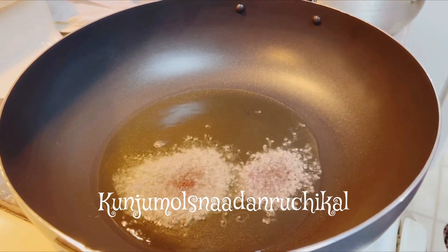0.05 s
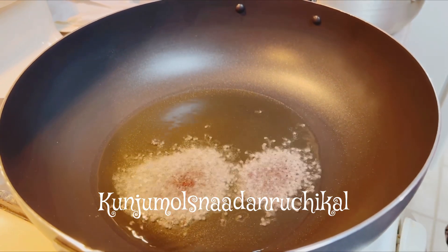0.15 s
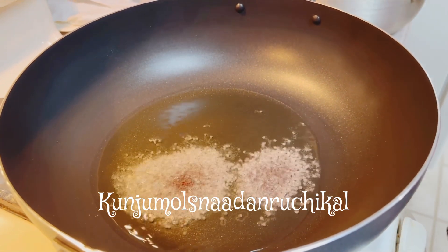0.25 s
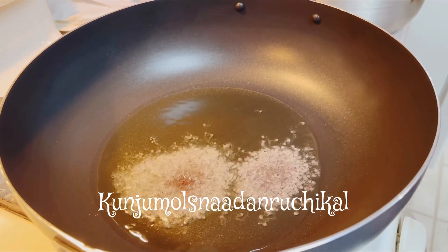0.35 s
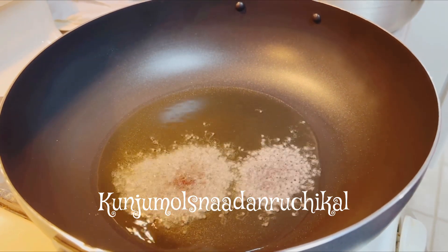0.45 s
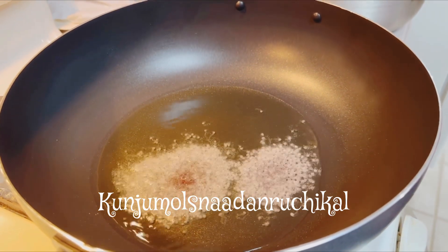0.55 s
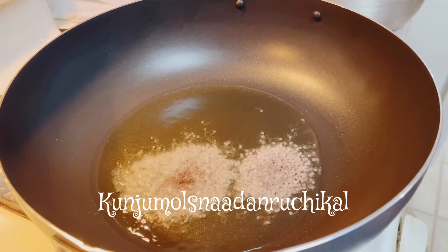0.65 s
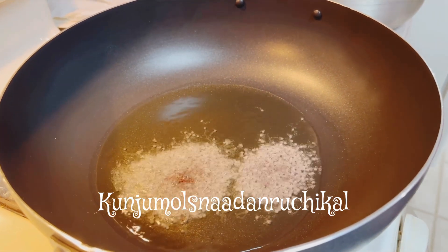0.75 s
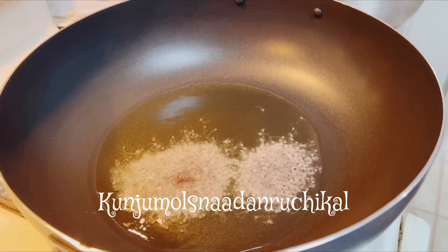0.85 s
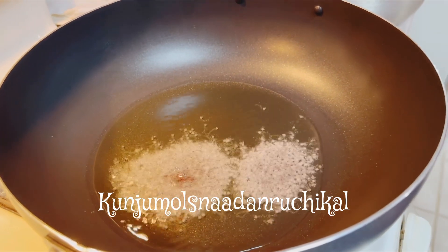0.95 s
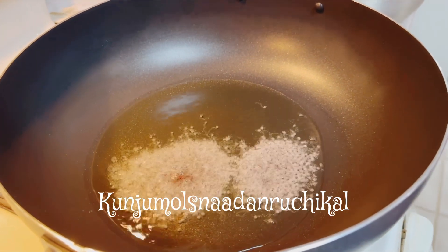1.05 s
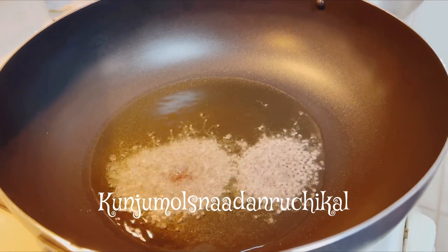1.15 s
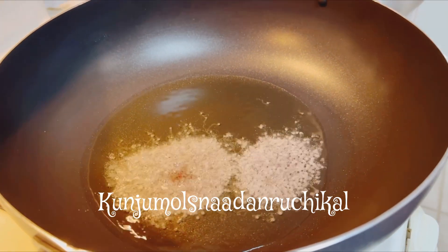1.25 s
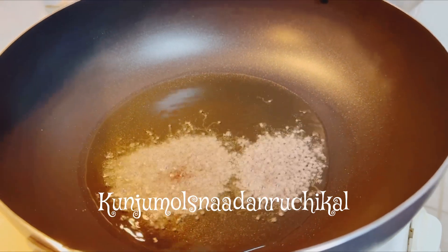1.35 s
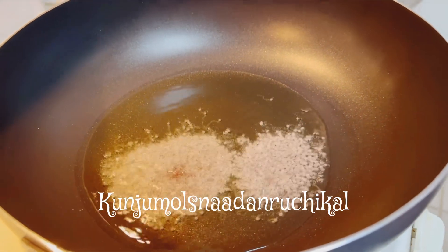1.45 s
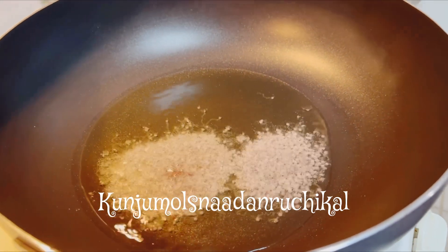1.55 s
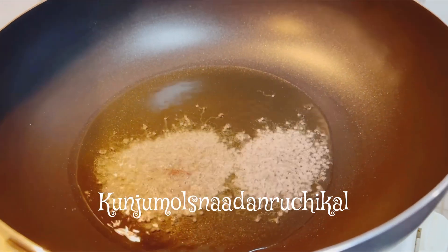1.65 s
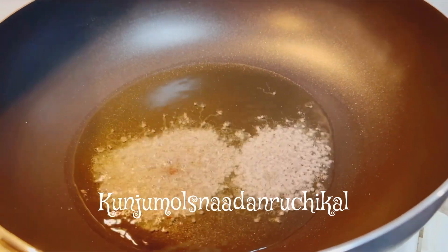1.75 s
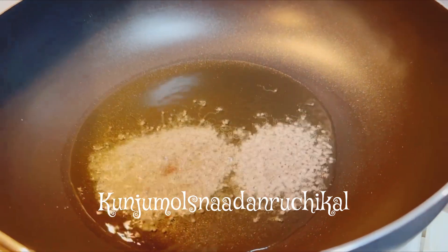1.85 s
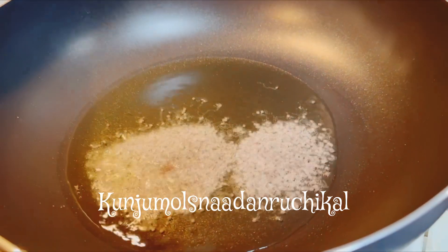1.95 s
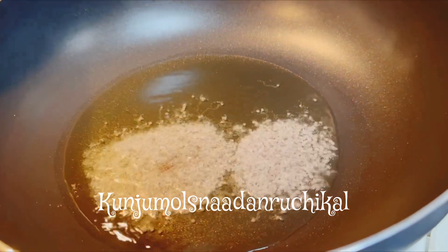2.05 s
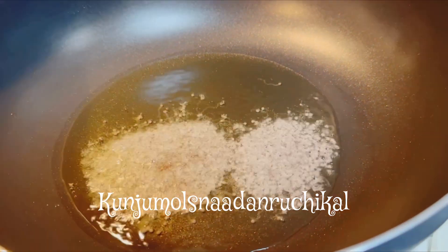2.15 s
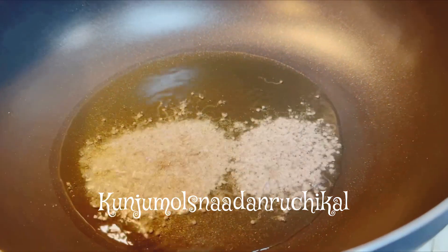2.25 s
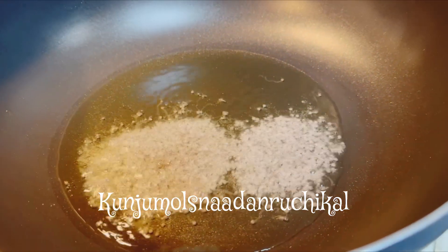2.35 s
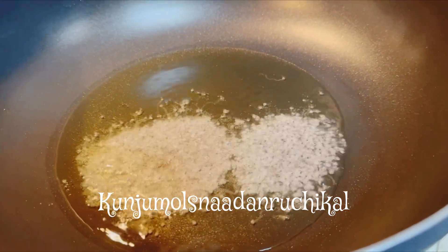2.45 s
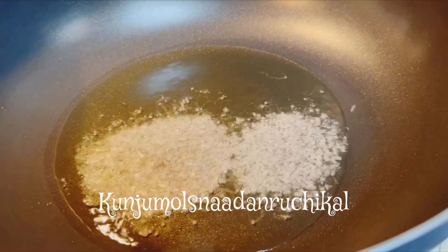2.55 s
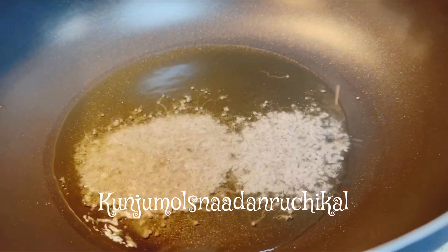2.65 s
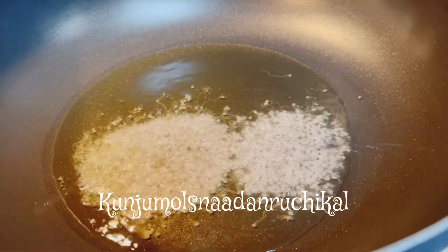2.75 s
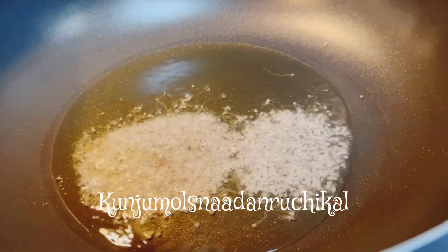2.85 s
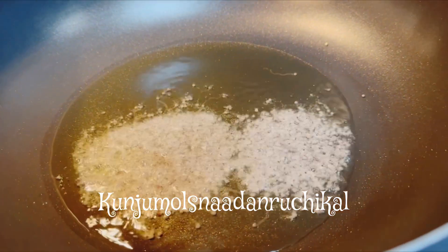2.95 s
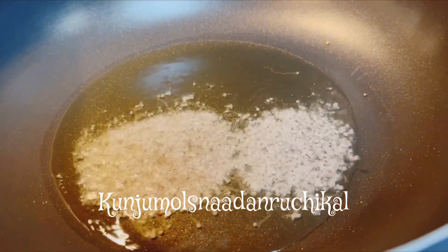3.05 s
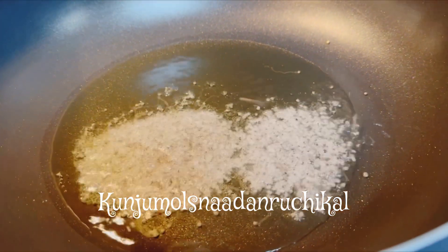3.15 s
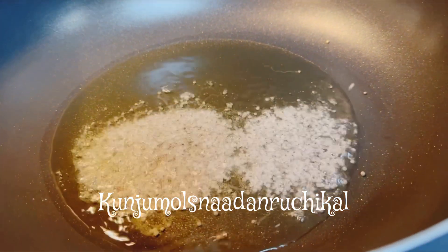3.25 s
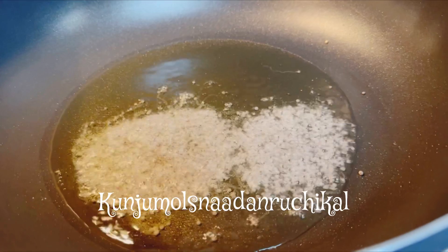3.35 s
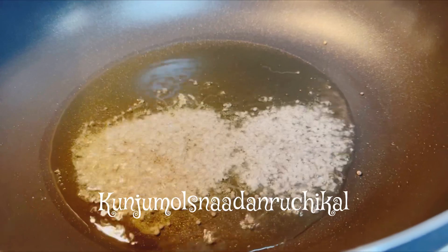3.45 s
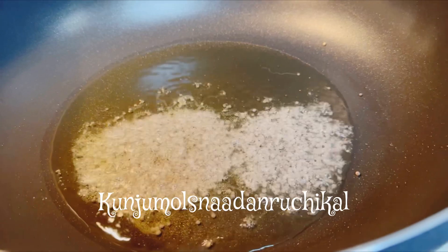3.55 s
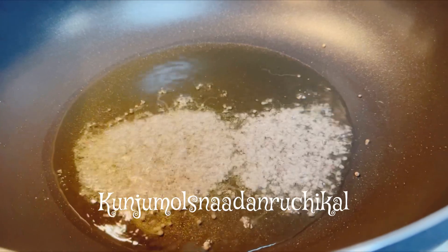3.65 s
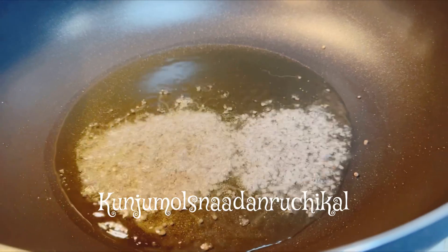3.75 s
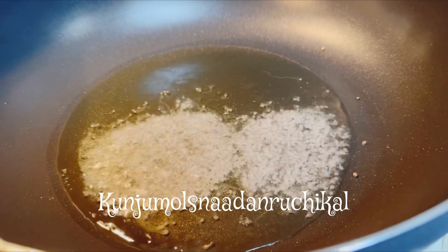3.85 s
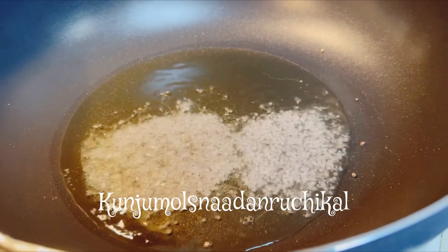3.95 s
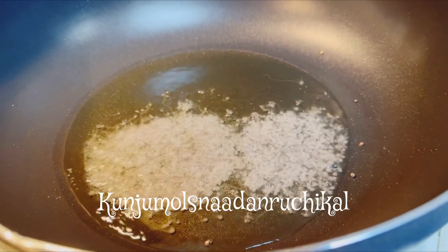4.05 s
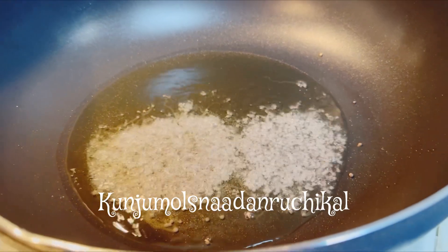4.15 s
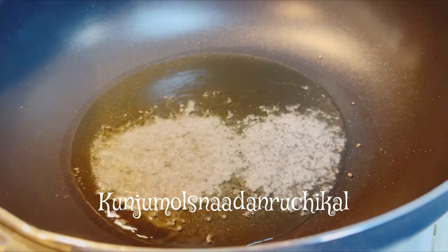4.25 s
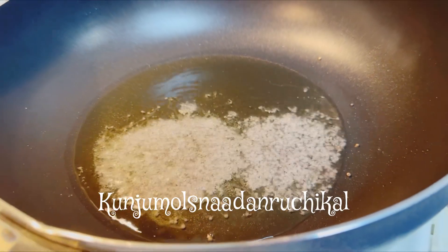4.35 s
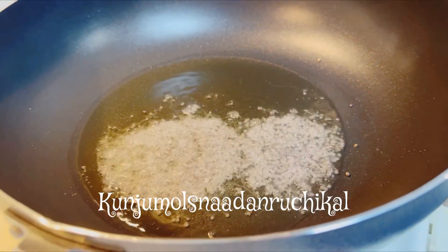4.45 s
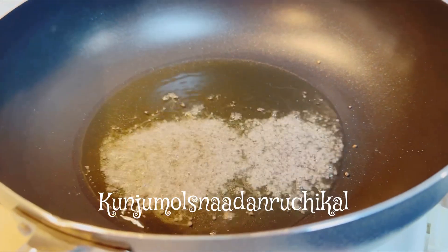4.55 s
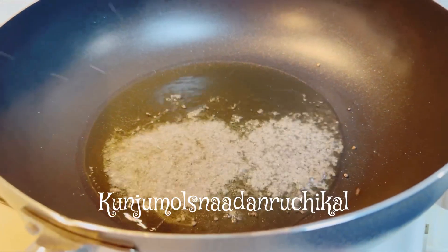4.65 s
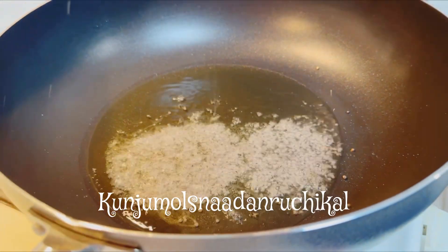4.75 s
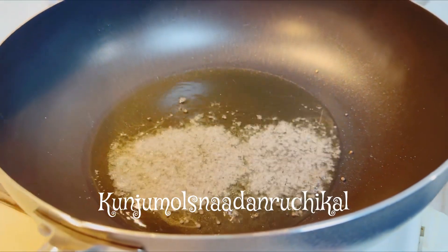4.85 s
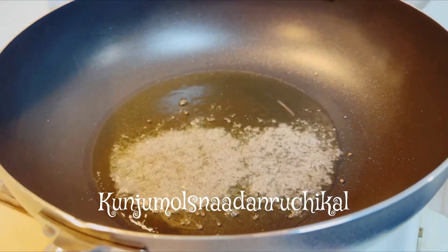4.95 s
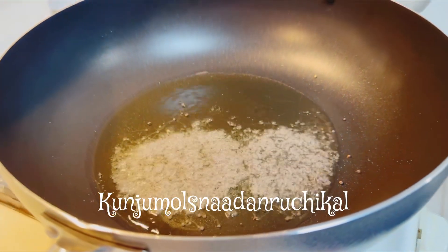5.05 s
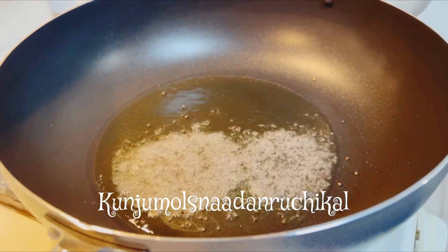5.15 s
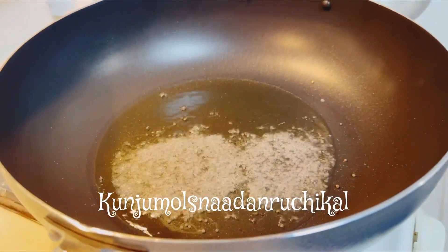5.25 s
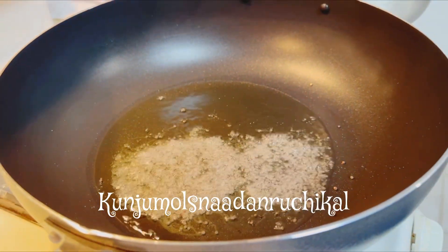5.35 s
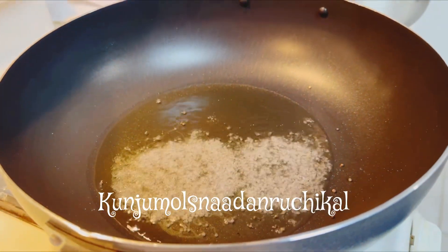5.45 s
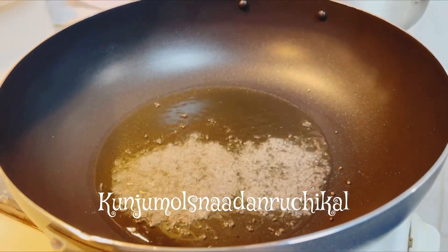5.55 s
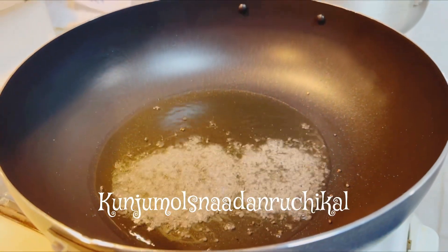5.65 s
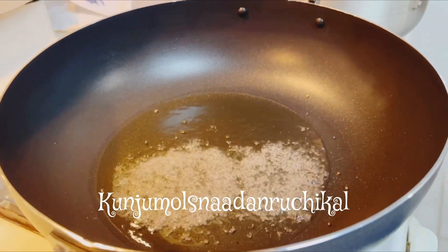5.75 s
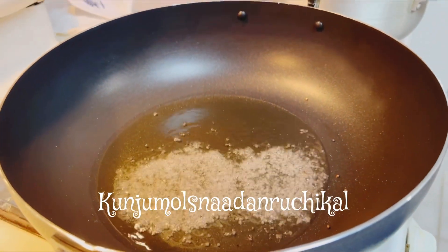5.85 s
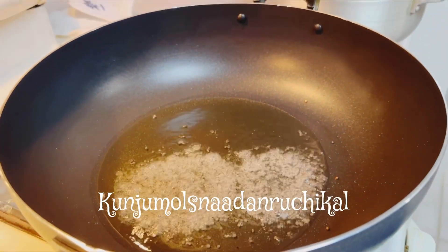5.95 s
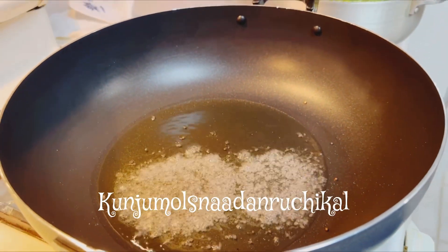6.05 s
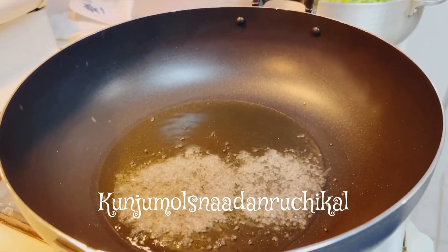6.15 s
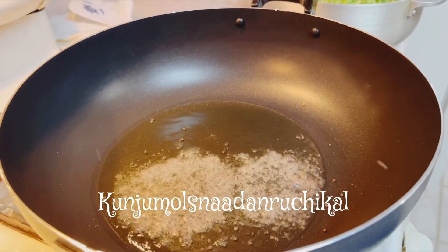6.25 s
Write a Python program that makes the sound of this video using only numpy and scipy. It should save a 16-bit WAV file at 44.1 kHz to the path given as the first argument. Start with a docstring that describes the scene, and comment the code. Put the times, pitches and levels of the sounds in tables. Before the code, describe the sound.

Small seeds fry in hot oil in a steel wok, heard close up in a kitchen. At first there is only a faint sizzle with a few scattered pops. The sizzle then thickens, and sharp cracks and small ringing plops come more and more often, with an occasional short hiss of steam. A low appliance hum runs underneath, along with three soft, dull bumps.

```python
"""Sharp cracks and small plops stand out from a fine sizzle: seeds frying in hot oil in a wok, close by.
Each splitting husk is a broadband impulse, each steam bubble under the oil a damped oscillator, and both
excite the modes of the steel bowl. Some split seeds hiss out steam, and the sizzle thickens as the seeds
heat up. Behind are three soft bumps and the hum of a kitchen appliance."""
import sys
import numpy as np
from scipy import signal
from scipy.fft import rfft, irfft, next_fast_len
from scipy.io import wavfile
from scipy.ndimage import uniform_filter1d, map_coordinates

SR = 44100
rng = np.random.default_rng(int(sys.argv[2]) if len(sys.argv) > 2 else 0)


def unload_audio(sound):
    """Save the sound as a 16-bit wav file, at the path given as the first command line argument."""
    columns = np.transpose(np.atleast_2d(sound))
    # keep every value between -1 and 1, then stretch to whole-number steps
    steps = np.round(np.clip(columns, -1, 1) * 32767)
    wavfile.write(sys.argv[1], SR, steps.astype(np.int16))


N = 276948

# Spectrum of a fracture: (frequency [Hz], level [dB])
FRACTURE_SPECTRUM = [(200, -28), (500, -14.5), (1000, -12), (2500, -7), (4500, -1.5), (6500, -3.5),
                     (10000, 0), (13000, -4.5), (15500, -3.5), (16300, -18), (16900, -48)]
def husk_crack(db, mid_db, top_db, t):
    """Brittle fracture: a spike and its splinters radiate a broad spectrum, coloured by the seed."""
    splinters = rng.standard_normal((2, len(t))) * decay(t, -.0005, t60=.004)
    spike = (t == t[t >= 0][0]) * rng.choice([-1, 1]) * np.array([[1], [.4]])
    blow = spike + .45 * splinters / np.linalg.norm(splinters, axis=1, keepdims=True)
    scatter_db = -10 - 0.39 * db + 0.059 * mid_db  # a smaller share if loud, a larger one if full
    burst = amp(14.5) * blow + amp(scatter_db) * reflections(t, echo_db=3.5)
    mid = lambda f: mid_db * curve([(6000, 0.81), (8000, 0.15)], f)
    top = lambda f: top_db * curve([(12500, 0.081), (14000, 0.89)], f)
    return amp(db) * filtered(burst, lambda f: amp(curve(FRACTURE_SPECTRUM, f) + mid(f) + top(f)))


# Distinct husk fractures: (time [s], treble level [dB], mid colour [dB], top colour [dB])
HUSK_FRACTURES = [(0.0063, -19.5, -0.5, -3), (0.5482, -31, -10.5, 13), (0.7004, -23.5, -16, -3),
                  (1.0536, -8.5, -12, 3), (1.229, -40, 5.5, 0.0), (1.488, -18, -6, 7),
                  (1.673, -25, -14.5, -10.0), (1.6837, -10.5, -14, -6.0), (1.7177, 1, -20, -23),
                  (1.7766, -26, -7, -3.0), (1.842, -32, -10, -5.0), (1.8527, -35, 12.5, 0.0),
                  (1.964, -26.0, -5, 5), (2.0158, -31.0, -11, 2), (2.051, -19, 0, -5.0),
                  (2.056, -12.5, 5, -3), (2.2354, -26.0, -22, 0.0), (2.3203, -14.5, -2, 8),
                  (2.3569, -24, -8, -2.0), (2.395, -5.5, 0, -1), (2.433, -41, 9, 0.0),
                  (2.5208, -11, 0.5, -4), (2.623, -16, 4, -3.0), (2.6363, -7.5, -9, 8),
                  (2.7015, -24.5, 10.5, -1), (2.7311, -16, -8.5, 16), (2.7732, -13, -6.5, -3),
                  (2.786, -24, -2, 1.0), (2.875, -11.5, -5, 4), (2.9065, -13.5, -10, -6.0),
                  (2.9148, -20.5, -12, -1.0), (2.9232, -22, -6, 0.0), (2.9295, -21.5, 10.5, 3.0),
                  (3.0062, -31, -7, 8), (3.0222, -10, -5.5, 1), (3.1104, -8.0, -1, 7),
                  (3.1431, -17, 4.5, -2), (3.1579, -8.5, 3, -1), (3.1838, -28, -1, -3.0),
                  (3.1947, -23, 0, -5.0), (3.214, -28, -5, 8), (3.2347, -23, -3, 1.0),
                  (3.3154, -12, -3, 13), (3.371, -24.5, 1.5, -2.0), (3.3862, -25, -3, -2.0),
                  (3.4003, -28, -21, 10), (3.4083, -27, -20, 2.0), (3.432, -10, -24, -14.0),
                  (3.4394, -11, -25, -2), (3.454, -14, -0.5, -7.0), (3.464, -10.5, -12, -4.0),
                  (3.4871, -29, -11, 0.0), (3.511, -4.5, -28, -11.0), (3.5374, -17, 5.5, 3),
                  (3.5631, -8, -11.5, 3), (3.5895, -12.5, 5.5, -1), (3.658, -10.5, -4, 5),
                  (3.686, -20, -6, -3.0), (3.7187, -22, -3, 0.0), (3.7222, -12, -24, -6.0),
                  (3.74, -25, -14, -8.0), (3.765, -11, -11, -6.0), (3.7834, -6.5, -10, 0),
                  (3.851, -11, 4.5, 1.0), (3.8902, -9, -10.5, 1), (3.933, -7, 0, -1),
                  (3.9884, -9, -13.5, -10.0), (4.0134, -9.5, -1.5, 1), (4.0675, -14.5, 2, -1.0),
                  (4.1088, -16.5, 2, -7.0), (4.2014, -6, -15, 5), (4.2406, -13, -18, -12.0),
                  (4.254, -27, -1, 0.0), (4.2718, -25, -7, -13.0), (4.283, -30, 15.5, 0.0),
                  (4.349, -14, 0.5, 0), (4.3797, -20, -23, -4.0), (4.387, -18.0, -22, -7.0),
                  (4.3928, -7.5, -0.5, 9), (4.4157, -32, -1, 0.0), (4.4387, -27, 4.5, 1.0),
                  (4.4499, -24, -9, 0.0), (4.5182, -12.5, -4.5, 2), (4.5465, -6, -4.5, -8),
                  (4.5542, -11.5, 6.5, -7.0), (4.5656, -6.5, -6, 0.0), (4.644, -26.5, 0, 0.0),
                  (4.695, -14, -4, 11), (4.754, -7, -1, -7), (4.914, -14, -3, 7), (4.93, -7.5, -4, 2),
                  (4.986, -27, -4, 0.0), (5.0223, -14, 2.5, -6), (5.091, -21.5, 6, -6.0),
                  (5.1165, -30, -2, -3.0), (5.1536, -14.5, -12, -2.0), (5.1678, -10, 1.5, -2.0),
                  (5.206, -8.5, -8.5, -9), (5.2273, -8, -12, -3.0), (5.2315, -20, -12.0, 4.0),
                  (5.2475, -29, 0, 6.0), (5.2582, -13, -10, -3), (5.275, -22, -1, -3.0),
                  (5.281, -24, 2, 4.0), (5.3388, -31, -13, 6), (5.387, -6, -7, 8), (5.415, -27, 4, -4),
                  (5.422, -8.5, -4, -2.0), (5.4632, -10.5, -9, 6), (5.477, -18, -11, 5.0),
                  (5.4892, -5.5, -9, -8.0), (5.544, -33, 7, 0.0), (5.5762, -18, -0.5, -2),
                  (5.5848, -25.0, -1.0, -3), (5.6129, -18, 0.5, -14.0), (5.6528, -25, 2, 6.0),
                  (5.6794, -13, -7, 9), (5.694, -14, -6.5, -1.0), (5.7132, -17.5, -2, 5),
                  (5.7483, -33, 5, 4.0), (5.7931, -21.5, -4.5, -3), (5.8098, -20, -9, -5.0),
                  (5.877, -38, -1, 7.0), (5.951, -30, 5, -2), (6.0208, -29, 0, 1), (6.0344, -8, -13, 10),
                  (6.0694, -26.0, -11, -4.0), (6.095, -19.5, -0.5, 2.0), (6.1282, -16.5, 5.5, -7),
                  (6.133, -19.5, 4.5, 4.0), (6.1647, -24, 10, 6), (6.1682, -8.5, -8, 4),
                  (6.1814, -18, -11, -1.0), (6.224, -25, -12, 1.0), (6.2365, -7.5, -1.5, 1),
                  (6.2428, -10, -3, 6), (6.2565, -16, 0.5, 0)]
def husk_cracks():
    """Superposed impulses: distinct cracks, and faint random ones whose rate rises with the heat."""
    lead_in_s = .002
    out, t = np.zeros((2, N)), np.arange(SR // 8) / SR - lead_in_s
    for s, db, mid_db, top_db in HUSK_FRACTURES:
        add(out, s - lead_in_s, husk_crack(db, mid_db, top_db, t))
    for when, size, mid, top in rng.random((190, 4)):
        faint = husk_crack(-43 - 2 * np.log(size), 12 * (mid - 1), 12 * (top - .5), t[:SR // 90])
        add(out, N / SR * when ** 0.34, faint)
    return out


# Bursting steam bubbles: (time [s], level [dB], frequency [Hz], 60 dB decay time [cycles])
STEAM_BUBBLES = [(0.0064, -22, 3870, 33), (0.1684, -32, 2980, 33), (0.6996, -24.5, 2340, 9),
                 (0.864, -31.5, 1900, 20), (0.997, -42.5, 4400, 40), (1.18, -32.5, 1950, 17),
                 (1.2423, -30, 2290, 6), (1.501, -38, 2700, 13), (1.5541, -28.5, 1770, 21),
                 (1.683, -23.5, 4580, 45), (1.7506, -16.5, 3370, 38), (1.777, -31.5, 3400, 40),
                 (1.7912, -34, 3300, 25), (1.852, -29.5, 3030, 10), (1.899, -30, 1930, 8),
                 (1.964, -19.5, 2920, 8.5), (2.055, -33, 4400, 36), (2.347, -40, 3040, 19),
                 (2.5145, -32, 3840, 65), (2.6232, -19.5, 3950, 38), (2.7, -36, 2600, 25),
                 (2.804, -26.5, 4340, 50), (2.915, -19.5, 4280, 40), (2.93, -22, 3200, 36),
                 (3.0393, -20.5, 4400, 10), (3.1431, -16.5, 3660, 23), (3.342, -28, 3130, 6),
                 (3.44, -16, 3150, 27), (3.455, -23.5, 3050, 49), (3.5895, -21.5, 2730, 10),
                 (3.6877, -31, 2760, 30), (3.718, -19.5, 4320, 42), (3.723, -27, 2970, 83),
                 (3.81, -20, 3730, 20), (3.8497, -13, 3690, 18), (3.9828, -37, 3670, 61),
                 (4.0178, -22.5, 3200, 17), (4.0203, -22, 5040, 35), (4.1079, -24.5, 3190, 57),
                 (4.2394, -17, 2680, 3.5), (4.288, -14, 2140, 25), (4.347, -29, 2400, 13),
                 (4.4341, -27.5, 4130, 35), (4.455, -39.5, 2210, 45), (4.513, -31.5, 2490, 25),
                 (4.554, -12.5, 2400, 12), (4.579, -24.5, 4300, 40), (4.7545, -6.5, 2150, 19.5),
                 (4.848, -30, 2470, 13), (4.9143, -20.5, 3830, 26), (4.99, -32, 4950, 45),
                 (5.0224, -12.5, 2320, 20), (5.0905, -23.5, 3200, 8), (5.1247, -24.5, 2880, 11),
                 (5.232, -16.5, 2900, 14), (5.2573, -17, 2780, 12), (5.2763, -28, 2970, 27),
                 (5.3702, -22, 2520, 17), (5.4214, -14, 2900, 15), (5.4749, -17, 2340, 14),
                 (5.5076, -19, 2270, 37), (5.6521, -21, 4790, 55), (5.716, -18.5, 2650, 3),
                 (5.7622, -22.5, 3380, 11), (5.811, -30, 4430, 47), (5.9335, -30, 2740, 5),
                 (5.992, -40.5, 3030, 90), (6.061, -26.5, 2920, 32), (6.131, -23.5, 4600, 40)]
def bubble_plops():
    """Damped oscillation: each bubble rings and excites the steel modes near and below its pitch."""
    out, t = np.zeros((2, N)), np.arange(SR // 5) / SR
    for s, db, hz, cycles in STEAM_BUBBLES:
        partial = lambda ratio: np.sin(2 * np.pi * ratio * hz * t + [[0], [np.pi / 2]])
        tone = partial(1) + amp(-15) * partial(2.02)
        ring = tone * decay(t, 0, t60=abs(cycles) / hz) * attack(t, .0003)
        scatter = filtered(reflections(t, echo_db=-26), lambda f: resonance(f, hz, 0.77 * hz) ** 2)
        drive = lambda f: resonance(f, hz, 1.53 * hz) ** 2 / (1 + (f / (1.6 * hz)) ** 4)
        modes = lambda f: sum(
            amp(level + rng.normal(0, 4.6)) * rng.choice([-1, 1]) * resonance(f, centre, width)
            for centre, width, level in STEEL_MODES)
        steel = filtered((t == 0) * np.array([[1], [.5]]), lambda f: drive(f) * modes(f))
        puff = rng.standard_normal((2, len(t))) * decay(t, 0, t60=0.017)
        thump = filtered(puff, lambda f: resonance(f, 950, 2200) ** 2)
        steel_db, thump_db = 21 - 0.073 * db, -15 - 0.25 * db  # both grow less than the ring
        plop = amp(6.5) * ring + amp(3) * scatter + amp(steel_db) * steel + amp(thump_db) * thump
        add(out, s, amp(db) * plop)
    return out


# Normal modes of the steel bowl: (frequency [Hz], bandwidth [Hz], level [dB])
STEEL_MODES = [(905, 34, 0), (1055, 28, 6), (1565, 20, -9), (2030, 20, -6), (2155, 20, 1), (2290, 60, -10),
               (2550, 16, -5), (2785, 24, -3), (3020, 70, -6), (3230, 20, -5), (3655, 16, -4),
               (4160, 22, -3), (4480, 40, -6)]
def wok_ring(sound, ring_db):
    """Forced vibration: the modes of the steel add their response to the sound that drives them."""
    modes = lambda f: sum(amp(db) * resonance(f, hz, width) for hz, width, db in STEEL_MODES)
    return filtered(sound, lambda f: 1 + amp(ring_db) * modes(f))


def reflections(t, echo_db):
    """Reverberation as decaying noise: an echo and scatter in the bowl, a duller kitchen."""
    lowpass = lambda f, hz: (f < 15850) / (1 + (f / hz) ** 2)
    noise = rng.standard_normal((2, 2, len(t)))
    bowl, kitchen = filtered(noise, lambda f: [[lowpass(f, 13000)], [lowpass(f, 9000)]])
    echo = amp(echo_db) * decay(t, 0.003, t60=0.0017)
    scatter = decay(t, .0006, t60=0.031)
    return bowl * (echo + scatter) + kitchen * amp(-12.5) * decay(t, 0.0013, t60=0.19)


# Steam escaping from seeds: (time [s], level [dB], centre frequency [Hz], 60 dB decay time [s])
STEAM_JETS = [(1.721, -36.5, 6850, 0.41), (2.9, -58, 5000, 0.17), (3.431, -51, 8000, 0.18),
              (4.014, -14, 5000, 0.038), (4.547, -24.5, 4900, 0.17), (5.256, -28, 6000, 0.1),
              (5.46, -36, 5930, 0.37), (6.16, -39, 6100, 0.26)]
def steam_jets():
    """Jet noise: a split seed hisses for a moment, in uneven spurts."""
    out, t = np.zeros((2, N)), np.arange(SR // 5) / SR
    for s, db, hz, t60 in STEAM_JETS:
        noise = rng.standard_normal((2, len(t)))
        hiss = unit_rms(filtered(noise, lambda f: resonance(f, hz, hz) * (f < 15850)))
        spurts_db = 3.4 * wobble(130)[:len(t)]
        add(out, s, amp(db + spurts_db) * hiss * decay(t, 0, t60) * attack(t, 0.0075))
    return out


# Spectrum of the broad froth: (frequency [Hz], spectral level [dB])
FROTH_SPECTRUM = [(300, -1.5), (700, -5.5), (1300, -9), (2200, -0.5), (3000, -3.5), (4500, -2),
                  (6000, -2.5), (8000, -5), (11000, 1), (15700, -16), (15950, -80)]
# Growth of the froth: (time [s], level [dB])
FROTH_ENVELOPE = [(0.0, -53.5), (0.49, -55.5), (1.57, -53.5), (1.85, -52.5), (2.31, -52), (2.94, -49),
                  (3.41, -48), (3.73, -47), (4.72, -48.5), (5.54, -48.5), (5.95, -47), (6.28, -47)]
# Spectrum of the finer fizz: (frequency [Hz], spectral level [dB])
FIZZ_SPECTRUM = [(4000, -28), (7000, -9), (8500, -5), (9600, -1), (10800, 0), (12500, -2.5), (14000, -1.5),
                 (15650, -1.5), (15900, -70)]
def sizzle():
    """Incoherent summation: dense small bubbles merge into noise, a froth under a fizz that heats up."""
    t = np.arange(N) / SR
    cold_db, hot_db, heating_s = -57.5, -47.5, 1.54
    fizz_db = hot_db + (cold_db - hot_db) * np.exp(-t / heating_s)
    froth_db = np.interp(t, *np.transpose(FROTH_ENVELOPE))
    froth = wok_ring(patchy_noise(FROTH_SPECTRUM, patch_db=1.9), ring_db=-7)
    fizz = patchy_noise(FIZZ_SPECTRUM, patch_db=1.4)
    return amp(froth_db) * froth + amp(fizz_db) * fizz


# Dull bumps: (time [s], level [dB], centre frequency [Hz])
DULL_BUMPS = [(.142, -40.5, 640), (0.638, -44, 520), (5.357, -34.5, 645)]
def soft_bumps():
    """Band-limited transients: low puffs of noise with a gradual onset sound soft and dull."""
    out, t = np.zeros((2, N)), np.arange(SR // 8) / SR
    for s, db, hz in DULL_BUMPS:
        noise = rng.standard_normal((2, len(t)))
        puff = unit_rms(filtered(noise, lambda f: resonance(f, hz, 1.46 * hz) ** 2))
        add(out, s, amp(db) * puff * decay(t, 0, t60=0.099) * attack(t, 0.0049))
    return out


# Motor tones: (frequency [Hz], level [dB], fluctuation [dB])
MOTOR_LINES = [(59.3, -43.5, 0.1), (118.7, -55, -1), (119.7, -69, 3), (152, -58, 1.2), (201.7, -54.5, 2.5)]
# Spectrum of the rumble: (frequency [Hz], spectral level [dB])
RUMBLE_SPECTRUM = [(25, -25), (40, -6), (50, 0), (100, -1), (140, -3.5), (190, -4), (240, -12), (400, -15),
                   (800, -25), (1500, -25.5), (4000, -43)]
def appliance_hum():
    """Periodic vibration: a motor gives a line spectrum, wavering slightly over a low rumble."""
    t, tones = np.arange(N) / SR, 0
    for hz, db, waver_db in MOTOR_LINES:
        peak = np.sqrt(2) * amp(db + waver_db * wobble(11))
        tones += peak * np.sin(2 * np.pi * hz * t + 0.065 * wobble(2.84))
    return tones * [[1], [.05]] + amp(-49) * patchy_noise(RUMBLE_SPECTRUM, patch_db=0.5)


# Likeness of the two microphone ports: (frequency [Hz], coherence [1])
PORT_COHERENCE = [(60, 0.98), (250, 0.91), (700, 0.69), (1300, 0.48), (2200, 0.38), (4000, 0.99), (6800, 1),
                  (8200, 0.91), (16000, 1)]
# Lead of left over right: (frequency [Hz], phase [rad])
PORT_PHASE = [(1000, 0), (2100, 0.25), (2700, -1.5), (4200, -1.32), (6100, -1), (7500, 1.3), (8200, -3),
              (9200, -3)]
# Left minus right: (frequency [Hz], level difference [dB])
PORT_BALANCE = [(60, 0.6), (700, -0.5), (1300, -1.5), (3000, -4), (4500, 0), (7000, -4), (8300, -0.5)]
def microphone_ports(pair):
    """Sum and difference stereo: left and right share the first signal and differ by the second."""
    angle = lambda f: np.arccos(np.clip(curve(PORT_COHERENCE, f), -1, 1)) / 2
    shared, apart = filtered(pair, lambda f: np.array([np.cos(angle(f)), np.sin(angle(f))]))
    treble_lead_s = 0.00024  # the highest frequencies reach the left port first
    phase = lambda f: np.where(f < 9000, curve(PORT_PHASE, f), 2 * np.pi * (f - 11200) * treble_lead_s)
    left = lambda f: amp(curve(PORT_BALANCE, f) / 2) * np.exp(.5j * phase(f))
    return filtered(np.array([shared + apart, shared - apart]), lambda f: np.array([left(f), 1 / left(f)]))


def patchy_noise(spectrum, patch_db):
    """Random modulation: two independent noises share patches of gain in time and frequency."""
    cells = signal.stft(rng.standard_normal((2, N)), nperseg=256)[2]
    patches = uniform_filter1d(rng.standard_normal(cells.shape[1:]), size=8, axis=0)
    patches = uniform_filter1d(patches, size=8, axis=1)
    pair = signal.istft(cells * amp(patch_db * unit_rms(patches)), nperseg=256)[1][:, :N]
    return unit_rms(filtered(pair, lambda f: amp(curve(spectrum, f))))


def resonance(f, hz, width_hz):
    """Complex response of a damped resonator."""
    return 1j * f * width_hz / (hz * hz - f * f + 1j * f * width_hz)


def decay(t, start, t60):
    """Exponential decay from start, by 60 dB in t60 seconds."""
    return (t >= start) * amp(-60 * (t - start) / t60)


def attack(t, rise_s):
    """Exponential approach to 1."""
    return 1 - np.exp(-t / rise_s)


def amp(db):
    """Amplitude ratio of a level."""
    return 10 ** (np.asarray(db) / 20)


def unit_rms(x):
    """Normalisation to rms 1."""
    return x / np.sqrt(np.mean(x ** 2) + 1e-20)


def curve(points, hz):
    """Interpolation of (frequency, value) points on a log frequency axis."""
    f, values = np.transpose(points)
    return np.interp(np.log(hz + 1), np.log(f + 1), values)


def wobble(rate):
    """Smooth random fluctuation, with rate knots a second."""
    return map_coordinates(rng.standard_normal(int(N * rate / SR) + 4), [np.arange(N) * rate / SR])


def filtered(x, response):
    """Linear filtering: the spectrum of x times a frequency response."""
    size = next_fast_len(x.shape[-1] + 4096)
    return irfft(rfft(x, size) * response(np.fft.rfftfreq(size, 1 / SR)), size)[..., :x.shape[-1]]


def add(track, s, sound):
    """Superposition of a signal pair on the track at time s."""
    part = track[:, round(s * SR):][:, :sound.shape[1]]
    part += sound[:, :part.shape[1]]


def scene():
    """Superposition: the bursts ring the wok and sum with the other sources at the microphone."""
    bursts = wok_ring(husk_cracks() + bubble_plops(), ring_db=-5)
    return microphone_ports(bursts + steam_jets() + soft_bumps() + sizzle() + appliance_hum())


def record(dry):
    """Band limiting: nothing above 17 kHz passes."""
    return filtered(dry, lambda f: f < 17000)


dry = scene()
out = record(dry)
unload_audio(out)
```